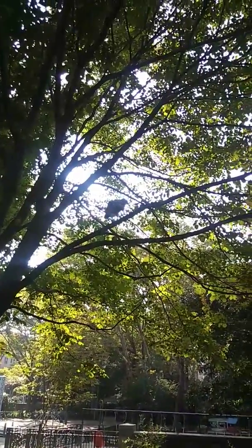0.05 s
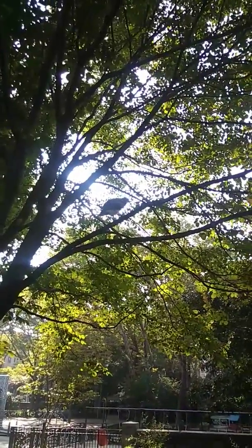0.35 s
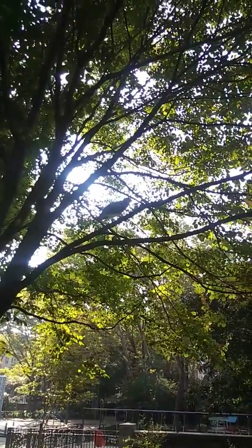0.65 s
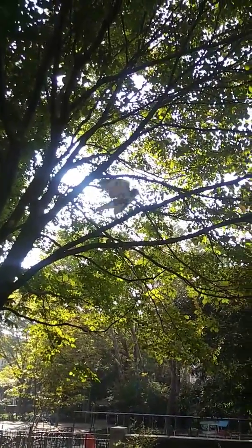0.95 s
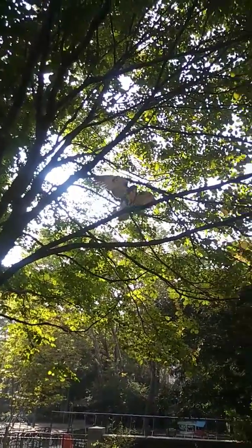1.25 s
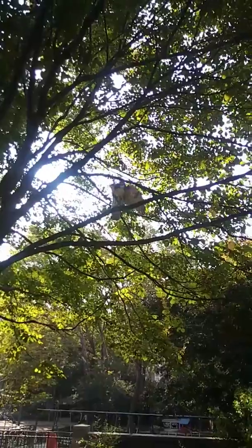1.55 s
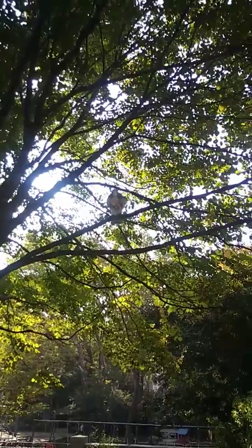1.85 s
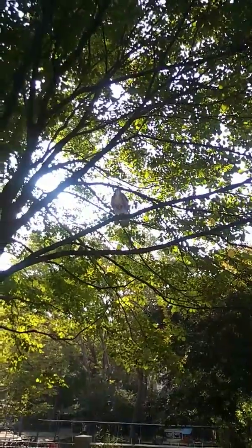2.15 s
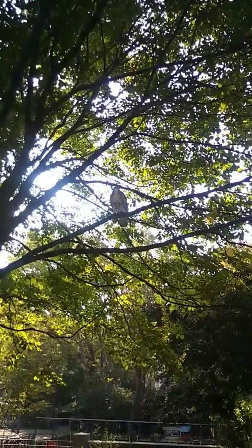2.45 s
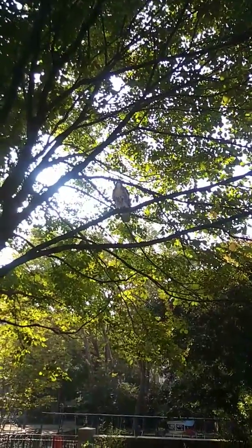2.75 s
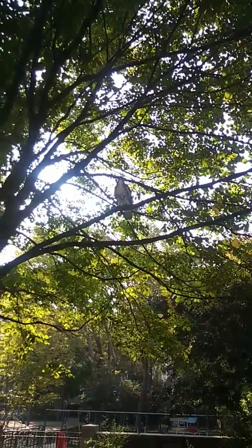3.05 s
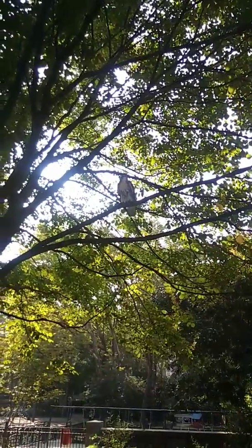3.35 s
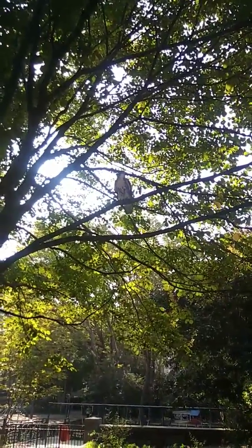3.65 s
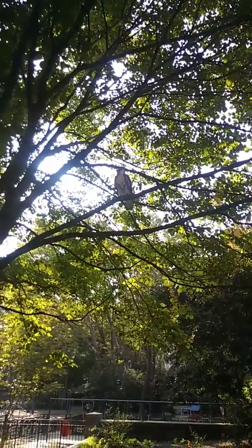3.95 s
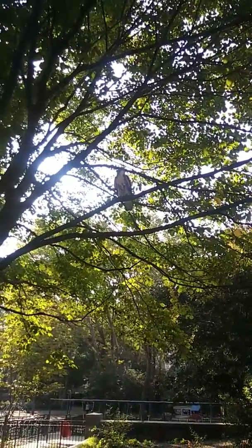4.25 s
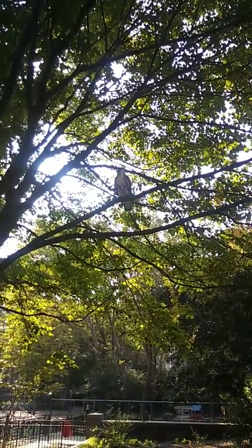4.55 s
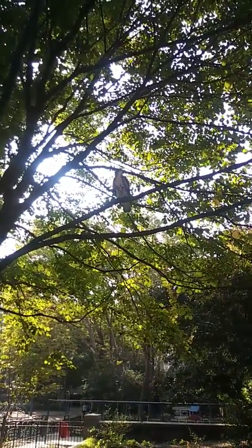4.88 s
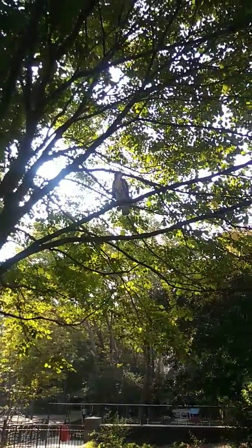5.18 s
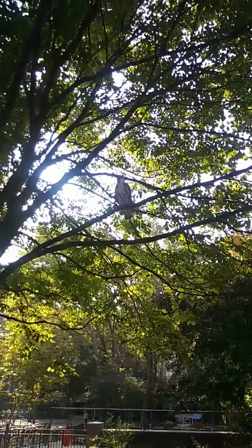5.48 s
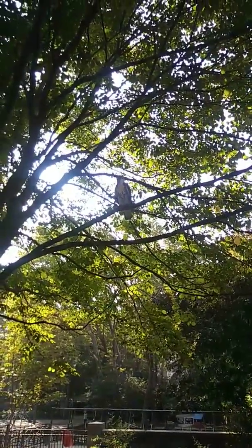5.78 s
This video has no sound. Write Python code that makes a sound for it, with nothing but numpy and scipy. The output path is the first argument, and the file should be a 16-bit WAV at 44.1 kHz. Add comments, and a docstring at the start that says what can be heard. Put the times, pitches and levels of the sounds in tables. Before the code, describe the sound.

Light gusts bump the microphone among park trees, where small birds repeat short, high chirps. A nearby large bird screams once, hoarse and arching, well above everything else, and a duller call like it comes from far away. The chirping carries on, each note with a short tail, joined by distant whistles and a few faint low blips. High insect hiss, soft leaves and town hum lie underneath.

```python
"""Small birds chirp and whistle over a 9 kHz insect hiss, a low town hum and a wash of leaves,
while light air buffets the microphone. Near 2 s a large bird in a park tree gives one harsh,
arching scream, hoarse as its pitch is forced up and breaking as it falls; a like call follows
from far off, among faint low blips. Trunks and leaves scatter every bird note into a short tail."""
import sys
import numpy as np
from scipy import signal
from scipy.fft import rfft, irfft, next_fast_len
from scipy.io import wavfile
from scipy.ndimage import uniform_filter1d

SR = 44100
rng = np.random.default_rng(int(sys.argv[2]) if len(sys.argv) > 2 else 0)


def transcribe(signal):
    """Save signal, clipped to [-1, 1], as a 16-bit WAV file at the path in sys.argv[1]."""
    frames = np.atleast_2d(signal).T
    limited = np.clip(frames, -1, 1)
    pcm = np.round(limited * 32767).astype(np.int16)
    wavfile.write(sys.argv[1], SR, pcm)


N = 265482
TIME = np.arange(N) / SR


def amp(db):
    """Decibels to gain."""
    return 10 ** (np.asarray(db) / 20)


def unit(x):
    """Scales to rms 1."""
    return x / np.sqrt(np.mean(x ** 2) + 1e-20)


def read(points, hz):
    """Interpolates a table on a log-frequency axis."""
    f, value = np.transpose(points)
    return np.interp(np.log(hz + 1), np.log(f), value)


def add(mix, s, sound):
    """Mixes a sound in at time s."""
    part = mix[max(round(s * SR), 0):][:len(sound)]
    part += sound[:len(part)]


def noise(spectrum):
    """Coloured noise, rms 1."""
    size = next_fast_len(N)
    gain = amp(read(spectrum, np.fft.rfftfreq(size, 1 / SR)))
    return unit(irfft(rfft(rng.standard_normal(size)) * gain, size)[:N])


def wander(rate_hz, size=N):
    """Random drift, rms 1, low-passed at rate_hz."""
    padded = next_fast_len(size)
    rolloff = 1 + (np.fft.rfftfreq(padded, 1 / SR) / rate_hz) ** 4
    return unit(irfft(rfft(rng.standard_normal(padded)) / rolloff, padded)[:size])


def chirp(length_s, pitches_hz, db, depth_hz, buzz_hz=190, rough=0.58, rough_hz=450):
    """A pure tone arcs through the pitches, shaken by a fast, uneven buzz."""
    u = np.linspace(0, 1, max(round(length_s * SR), 16))
    knots = np.linspace(0, 1, len(pitches_hz))
    arc_hz = np.polyval(np.polyfit(knots, pitches_hz, len(knots) - 1), u)
    buzz = np.sin(2 * np.pi * (buzz_hz * rng.uniform(0.868, 1.5) * length_s * u + rng.random()))
    hz = arc_hz + depth_hz * (buzz + rough * wander(rough_hz, size=8192)[:len(u)])
    phase = 2 * np.pi * np.cumsum(hz) / SR
    return amp(db) * np.sqrt(2) * np.sin(phase) * signal.windows.tukey(len(u), .7)


# Syllables: delay/s, length/s, start, middle, end pitch ratios, level/dB re call, buzz depth/Hz
CHEEP_SHAPE = [(-.011, .024, .81, .89, .98, -10, 260), (.001, .04, .99, 1, 1.02, .5, 140),
               (.022, .058, 1.08, .96, .83, -8, 340), (.08, .036, .83, .77, .68, -9, 300)]  # high bird: flick up, held top, two falling slurs
CHIRRUP_SHAPE = [(.001, .033, .97, 1, .93, 0, 120), (.024, .046, .93, .86, .81, -2, 250)]  # lower bird: arch, buzzy fall
# Calls: t/s, f/Hz, level/dB, last-syllable boost/dB, direct share/0-1
CHEEP_CALLS = [(0.015, 6110, -38, 1, 0.78), (0.775, 6160, -38, 4, 0.66), (1.444, 6423, -40.5, 6, 0.5),
               (2.514, 6285, -37, -0.5, 0.84), (3.006, 6540, -54, 4.5, 0.24),
               (4.083, 6210, -37.5, -6, 0.59), (4.777, 6230, -42, -36, 0.67)]
CHIRRUP_CALLS = [(0.529, 4380, -49.5, -4, 0.43), (1.043, 4280, -57.5, 14, 0.61),
                 (1.585, 4513, -38.5, 4, 0.61), (3.14, 4516, -57.5, 9.5, 0.88),
                 (3.833, 4354, -42.5, -0.5, 0.71), (4.391, 4482, -38.5, 3, 0.64),
                 (5.39, 4384, -57, 11.5, 0.2), (5.926, 4500, -49.5, 4.5, 0.62)]
# Slurred chips: t/s, length/s, start f/Hz, end f/Hz, level/dB
CHIP_SLURS = [(0, 0.019, 3900, 4730, -46.5), (0.018, 0.043, 5260, 4460, -47),
              (0.548, 0.034, 5660, 5430, -55), (0.601, 0.028, 3780, 3400, -52),
              (0.831, 0.015, 3210, 3100, -50.5), (1.274, 0.069, 5940, 5330, -46.5),
              (1.41, 0.028, 6400, 4285, -45), (1.441, 0.02, 4350, 5800, -42),
              (3.027, 0.017, 5000, 5000, -55.5), (3.051, .06, 6230, 5630, -51.5),
              (3.065, 0.044, 4110, 4460, -50), (3.523, 0.027, 6760, 5000, -55),
              (3.803, 0.04, 4590, 6600, -52.5), (4.108, 0.0249, 7100, 6100, -49),
              (4.188, 0.017, 4700, 4640, -55.5), (4.333, 0.028, 4270, 4210, -51.5),
              (4.378, 0.0099, 5730, 5600, -47.5), (4.626, 0.076, 3860, 5540, -53.5),
              (4.649, 0.026, 5870, 6920, -52.5), (4.761, 0.031, 4230, 3900, -51),
              (5.228, 0.039, 6470, 5260, -51.5), (5.256, 0.032, 4850, 3900, -48),
              (5.32, 0.028, 3297, 4044, -48), (5.446, .04, 6580, 6530, -59),
              (5.49, 0.05, 5200, 4870, -50.5), (5.897, 0.026, 4970, 6300, -53.5),
              (5.967, 0.048, 3530, 3750, -43)]


def syllables(blur_db_per_khz=22.5, chip_direct=0.3):
    """Two birds repeat their calls; short slurred chips sound within and between them."""
    for shape, calls in ((CHEEP_SHAPE, CHEEP_CALLS), (CHIRRUP_SHAPE, CHIRRUP_CALLS)):
        purest_hz = min(row[-1] for row in shape)
        for s, hz, call_db, last_db, direct in calls:
            for i, (delay_s, length_s, *arc, part_db, depth_hz) in enumerate(shape, 1):
                db = call_db + part_db + last_db * (i == len(shape))
                sound = chirp(length_s, hz * np.array(arc), db, depth_hz)
                blur_db = blur_db_per_khz * (depth_hz - purest_hz) / 1000  # wider buzz, less direct
                yield s + delay_s, sound, direct * amp(-blur_db)
    for s, length_s, start_hz, end_hz, db in CHIP_SLURS:
        yield s, chirp(length_s, [start_hz, end_hz], db, depth_hz=213), chip_direct


def small_birds(scatter_db=-5.5, path_count=4):
    """Part of each syllable arrives straight; the rest takes one of several paths through the trees."""
    straight, paths = np.zeros(N), np.zeros((path_count, N))
    for i, (s, sound, direct) in enumerate(syllables()):
        add(straight, s, direct * sound)
        add(paths[i % path_count], s, np.sqrt(1 - direct ** 2) * sound)
    return straight + amp(scatter_db) * sum(grove(path, build_s=0.011) for path in paths)


# Grove decay: f/Hz, T60/s
GROVE_T60 = [(1200, 0.25), (2100, 0.67), (2900, 0.51), (4000, 0.51), (6200, 0.46), (12000, 0.2)]


def grove(x, build_s=0.008, patchy_db=3.5, taps_per_s=3000):
    """Scatter from trunks and leaves: sparse echoes swell, then die band by band in uneven clumps."""
    taps = rng.standard_normal(SR) * (rng.random(SR) < taps_per_s / SR)
    hz, t, bands = signal.stft(taps, SR, nperseg=256)
    clumps = unit(uniform_filter1d(rng.standard_normal(bands.shape), size=7, axis=1))
    decay = amp(patchy_db * clumps - 60 * t / read(GROVE_T60, hz)[:, None])
    swell = 1 - np.exp(-t / build_s)
    tail = signal.istft(bands * decay * swell, SR, nperseg=256)[1]
    return signal.fftconvolve(x, tail / np.linalg.norm(tail))[:N]


# Chorus colour: f/Hz, relative density/dB
INSECT_SPECTRUM = [(4240, -38.5), (7200, -20.5), (7410, -20), (7750, -9.5), (8260, -16.5), (8640, 2.5),
                   (9040, 5.5), (9580, -7), (10200, -21.5), (10600, -20.5), (11200, -38.5), (13700, -28.5),
                   (14400, -41.5), (15000, -45.5), (15500, -54.5)]
# Chorus envelope: t/s, level/dB
INSECT_ENVELOPE = [(0, -57.5), (1.25, -59), (2.03, -55), (2.55, -62), (3.15, -58), (3.75, -59), (4.05, -63),
                   (4.8, -60.5), (5.45, -62.5), (6.02, -62.5)]
# Chorus dips: t/s, depth/dB
INSECT_LULLS = [(.065, 4.5), (1.015, 14), (2.744, 5.5), (4.049, 6.5), (5.549, 3.5)]


def insects(shimmer_db=1.33, drift_db=1.27, lull_half_width_s=0.037):
    """The chorus hisses near 9 kHz; its level shimmers, drifts and dips briefly."""
    level_db = np.interp(TIME, *np.transpose(INSECT_ENVELOPE))
    for s, depth_db in INSECT_LULLS:
        level_db -= depth_db * np.exp(-((TIME - s) / lull_half_width_s) ** 2)
    return noise(INSECT_SPECTRUM) * amp(level_db + shimmer_db * wander(50) + drift_db * wander(4.9))


# Leaf wash: f/Hz, relative density/dB
LEAF_SPECTRUM = [(45, -20), (120, 1), (900, 5.5), (1500, 4.5), (2400, -2), (4000, -5),
                 (6500, -19), (7500, -8), (9000, -21.5)]


def leaves(level_db=-72.5, rustle_db=1.54):
    """A faint, slowly wavering rustle."""
    return noise(LEAF_SPECTRUM) * amp(level_db + rustle_db * wander(3.8))


# Town hum: f/Hz, relative density/dB
HUM_SPECTRUM = [(88, -34.5), (150, -4), (400, -12), (469, -12.5), (565, -11), (911, -16.5), (1400, -24.5),
                (1820, -50.5), (3080, -120)]


def town_hum(level_db=-68):
    """Steady low noise of the town."""
    return amp(level_db) * noise(HUM_SPECTRUM)


# Air on the microphone: f/Hz, relative density/dB
WIND_SPECTRUM = [(15, -42), (25, -52.5), (40, -31.5), (57, -9), (75, -1.5), (91, 3), (169, -6),
                 (217, -17.5), (284, -19), (330, -26.5), (430, -54), (730, -120)]
# Gusts: t/s, hold/s, level/dB
WIND_GUSTS = [(0.131, 0.067, -47.5), (0.348, 0.074, -56), (0.757, .02, -64), (1.443, 0.01, -60),
              (1.575, 0.011, -62), (1.957, 0.019, -64), (2.301, 0.099, -62.5), (2.618, .12, -56),
              (2.951, 0.017, -65), (3.246, 0.14, -66), (3.5, 0.013, -64.5), (4.06, 0.022, -58.5),
              (4.449, 0.053, -55), (4.626, 0.045, -59), (4.777, 0.063, -56.5), (5.176, 0.059, -65)]


def wind(breeze_db=-73.5, swing_db=5, rise_s=0.0156, fall_s=0.068):
    """Air buffets the microphone: gusts rise fast, hold and die away over a lumpy breeze."""
    power = amp(breeze_db + swing_db * wander(7)) ** 2
    for s, hold_s, db in WIND_GUSTS:
        before_s, after_s = np.maximum(s - TIME, 0), np.maximum(TIME - s - hold_s, 0)
        power += (amp(db) * np.exp(-before_s / rise_s - after_s / fall_s)) ** 2
    return noise(WIND_SPECTRUM) * np.sqrt(power)


# Distant notes: t/s, length/s, start f/Hz, end f/Hz, source level/dB, octave/dB re note, waver/Hz
DISTANT_NOTES = [(0.033, 0.032, 1616, 1686, -60, -31, 15), (1.176, 0.18, 2286, 2418, -67, -13, 29),
                 (1.212, 0.098, 2933, 2820, -60, -19, 9.4), (1.684, 0.03, 1536, 1537, -65, -23, 15),
                 (2.26, 0.076, 1210, 1205, -58, -25, 7.4), (4.463, 0.3, 2610, 2860, -64, -28, 49),
                 (4.636, 0.19, 2730, 2840, -59.5, -5, 63), (4.435, 0.24, 2080, 2017, -73.5, -21, 83),
                 (5.072, 0.16, 1485, 1531, -52, -34, 56), (5.082, 0.11, 2795, 2940, -57, -22, 74),
                 (5.221, .27, 1534, 1406, -60, -7.5, 60), (5.192, 0.067, 2203, 2300, -64, -13, 26.5),
                 (5.421, 0.24, 2227, 2254, -63.5, -21, 26), (5.555, 0.15, 2227, 2296, -55.5, -1.5, 26.5),
                 (5.687, 0.19, 2804, 2753, -49, -16, 15.5), (5.953, 0.2, 2646, 3050, -56, -30, 35)]


def distant_birds(direct_db=-4, scatter_db=-2):
    """Held whistles and hoarse cries from deep in the trees: a wavering tone and its octave."""
    out = np.zeros(N)
    for s, length_s, start_hz, end_hz, db, octave_db, waver_hz in DISTANT_NOTES:
        size = round(length_s * SR)
        hz = np.linspace(start_hz, end_hz, size) + waver_hz * wander(183, size=32768)[:size]
        phase = 2 * np.pi * np.cumsum(hz) / SR
        tone = np.sin(phase) + amp(octave_db) * np.sin(2 * phase)
        add(out, s, amp(db) * np.sqrt(2) * tone * signal.windows.tukey(size, .4))
    return amp(direct_db) * out + amp(scatter_db) * grove(out)


def twitter(level_db=-70, late_s=4.3, late_boost_db=5, spread_db=4, scatter_db=-9, count=170):
    """Tiny far-off peeps at random, louder after late_s."""
    out, u = np.zeros(N), np.linspace(0, 1, SR // 36)
    for when, height, glide, strength in rng.random((count, 4)):
        s = when * N / SR
        hz = 2200 * 3.2 ** height * (1 + 0.035 * (glide - .5) * u)
        db = level_db + late_boost_db * (s > late_s) + spread_db * (2 * strength - 1)
        add(out, s, amp(db) * np.sin(2 * np.pi * np.cumsum(hz) / SR) * np.hanning(len(u)))
    return out + amp(scatter_db) * grove(out, build_s=0.02)


# Throat colour on upper harmonics, half harmonics and rasp: f/Hz, relative level/dB
THROAT_UPPER = [(6800, 18.5), (7700, -10), (8400, -23.5), (9500, -27), (10500, -20), (12600, -23),
                (15000, -36), (16500, -21)]
THROAT_HALVES = [(1000, -35), (2900, 3), (4900, -7.5), (6700, 1), (7500, -10.5), (8600, -2.5), (10000, -34),
                 (15000, -28)]
THROAT_RASP = [(1200, -41), (1900, -9), (2600, -2), (3100, 5.5), (3600, -9), (4200, -3.5), (5000, -6.5),
               (6200, 0), (7000, -58.5), (8800, -6.5), (11000, -36.5), (12600, -25), (15500, -35.5)]


def scream(contour, bright_db, upper_db, jitter, flutter_db, shiver,
           sway_db=3.5, sway_hz=16, strain_hz=1971, strain_span_hz=76.4, break_sag_hz=85):
    """A harmonic cry: rasp grows as the pitch is forced up, and the voice breaks as it falls."""
    s, *columns = np.transpose(contour)
    on = (TIME > s[0]) & (TIME < s[-1])
    age_s = TIME[on] - s[0]
    pitch_hz, level_db = (np.interp(TIME[on], s, column) for column in columns)
    top_hz = np.maximum.accumulate(pitch_hz)
    strain = np.clip((top_hz - strain_hz) / strain_span_hz, 0, 1)
    broken = np.clip((top_hz - pitch_hz) / break_sag_hz, 0, 1)
    open_db = bright_db - 38 * np.exp(-age_s / .033)  # overtones open with the beak
    late_db = -15.5 * np.exp(-age_s / .11)  # the highest open later still
    second_db = 3.2 - 2.5 * strain + 0.45 * open_db
    third_db = -3.5 - 7 * strain + 17.1 * broken + open_db
    doubling_db = -14 - 9.5 * strain + 11.8 * broken + open_db
    rasp_db = -36 + 16.7 * strain + open_db
    # Slow jitter bends the tone; fast shiver frays the upper harmonics.
    hz = pitch_hz * (1 + jitter * wander(92)[on] + shiver * strain * wander(900)[on])
    phase = 2 * np.pi * np.cumsum(hz) / SR
    harmonics_db = [0, second_db, third_db]
    for k in range(4, 9):
        harmonics_db.append(open_db + upper_db + (k > 4) * late_db + read(THROAT_UPPER, k * hz))
    voice = 0
    for k, db in enumerate(harmonics_db, 1):
        voice += amp(db + sway_db * wander(sway_hz)[on]) * np.sin(k * phase)
    # Alternate cycles differ: half harmonics, less steady than the tone.
    slip_rad = 0.27 * wander(130)[on]
    for k in np.arange(8) + .5:
        voice += amp(doubling_db + read(THROAT_HALVES, k * hz)) * np.sin(k * phase + slip_rad)
    envelope = amp(level_db + flutter_db * wander(68)[on]) * signal.windows.tukey(on.sum(), .05)
    rasp = amp(rasp_db) * noise(THROAT_RASP)[on]
    out = np.zeros(N)
    out[on] = envelope * (np.sqrt(2) * voice + rasp)
    return out


# Scream contours: t/s, f/Hz, source level of the fundamental/dB
NEAR_CONTOUR = [(1.885, 1575, -44.5), (1.912, 1770, -37), (1.935, 1804, -44.5), (1.975, 1904, -32.5),
                (2.04, 1915, -34.5), (2.078, 1957, -34.5), (2.125, 2030, -28), (2.2, 2069, -25.5),
                (2.26, 2106, -28), (2.335, 2130, -29), (2.375, 2115, -31.5), (2.408, 2050, -28),
                (2.434, 1870, -40.5)]
FAR_CONTOUR = [(3.26, 1913, -71.5), (3.43, 2081, -55.5), (3.57, 2155, -62), (3.72, 2120, -67.5),
               (3.82, 2090, -66.5)]


def large_birds():
    """The near scream comes mostly straight; the far call is duller and about half scatter."""
    near = scream(NEAR_CONTOUR, bright_db=-2.5, upper_db=-8.5,
                  jitter=0.0034, flutter_db=2.0, shiver=0.0011)
    far = scream(FAR_CONTOUR, bright_db=-15, upper_db=-5, jitter=0.0043, flutter_db=4.5, shiver=0.0019)
    scatter = amp(-12.5) * grove(near, build_s=0.0026) + amp(-4) * grove(far, build_s=.016)
    return near + amp(-4.5) * far + scatter


# Low blips: t/s, f/Hz, level/dB
BLIP_TONES = [(2.712, 800, -60.5), (2.972, 824, -67), (3.345, 1035, -63), (4.98, 663, -63),
              (5.378, 173, -57.5), (5.552, 397, -59.5), (5.82, 470, -58.5), (5.845, 823, -66)]


def blips(length_s=0.023):
    """Soft, short, low tones, barely over the hum."""
    out, t = np.zeros(N), np.arange(0, length_s, 1 / SR)
    for s, hz, db in BLIP_TONES:
        add(out, s, amp(db) * np.sqrt(2) * np.sin(2 * np.pi * hz * t) * np.hanning(len(t)))
    return out


def scene():
    """All the birds over the park's background, mono."""
    birds = large_birds() + small_birds() + distant_birds() + twitter()
    return (birds + blips() + insects() + leaves() + town_hum() + wind())[None]


def record(dry, cutoff_hz=15700):
    """The recorder's band limit."""
    lowpass = signal.firwin(511, cutoff_hz, window=("kaiser", 9), fs=SR)
    return signal.oaconvolve(dry, lowpass[None], "same")


dry = scene()
out = record(dry)
transcribe(out)
```